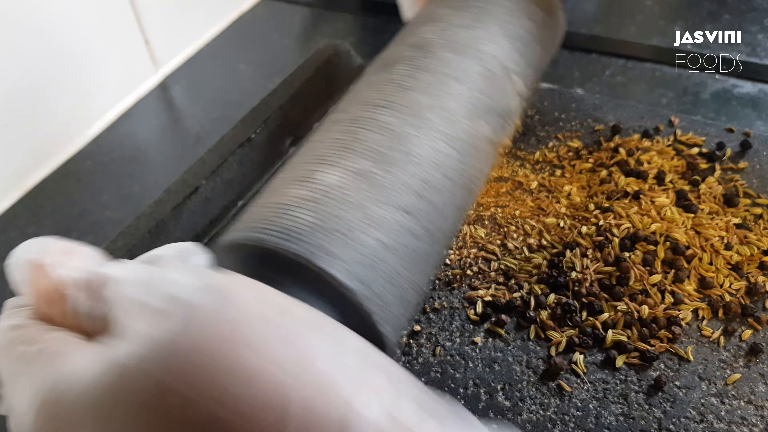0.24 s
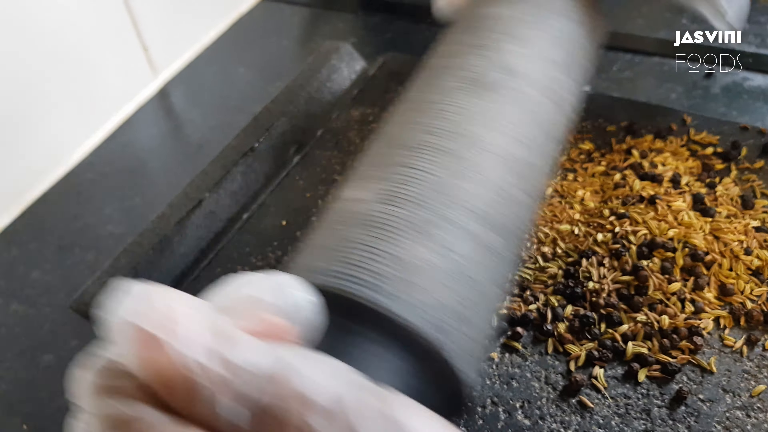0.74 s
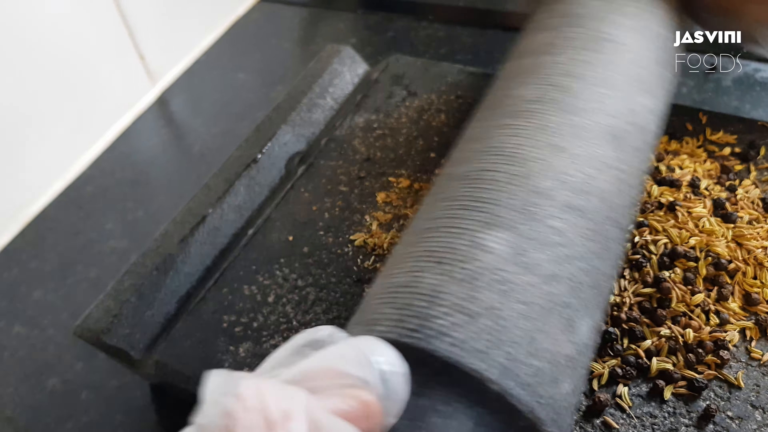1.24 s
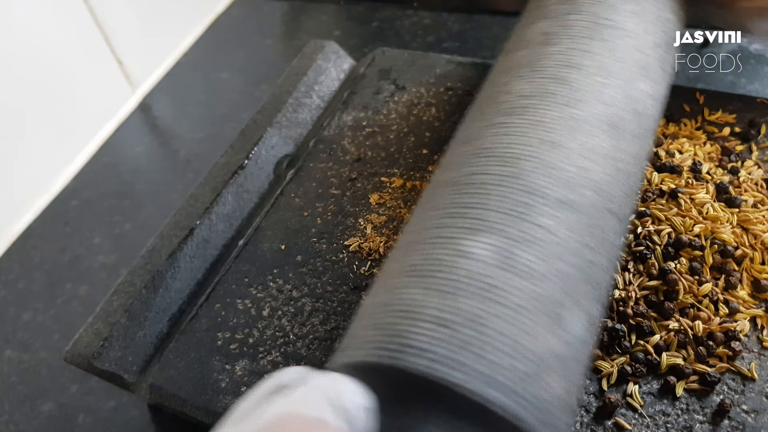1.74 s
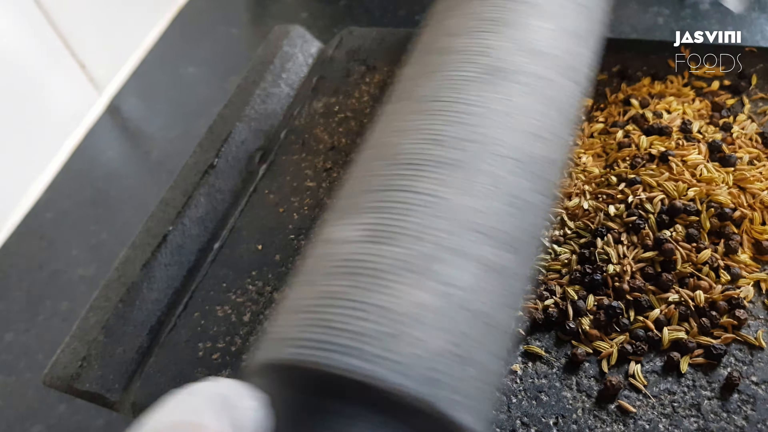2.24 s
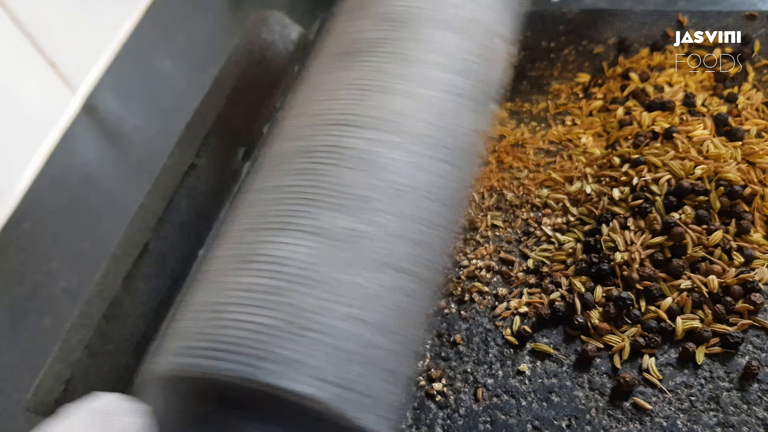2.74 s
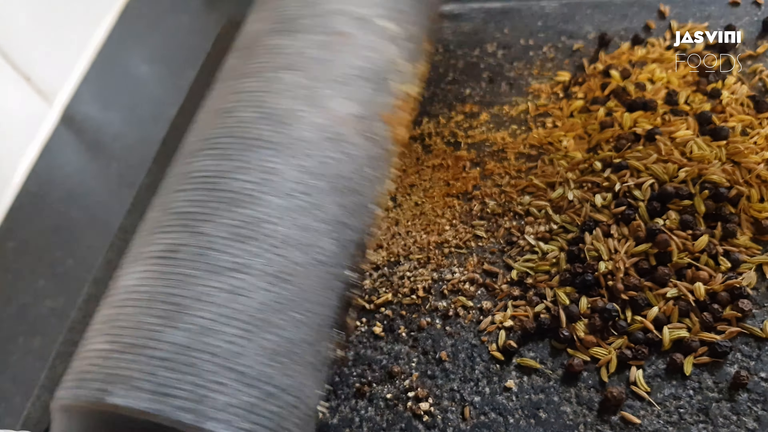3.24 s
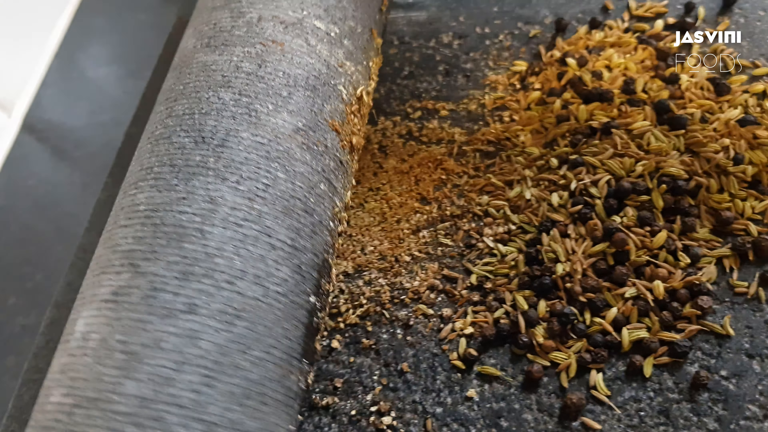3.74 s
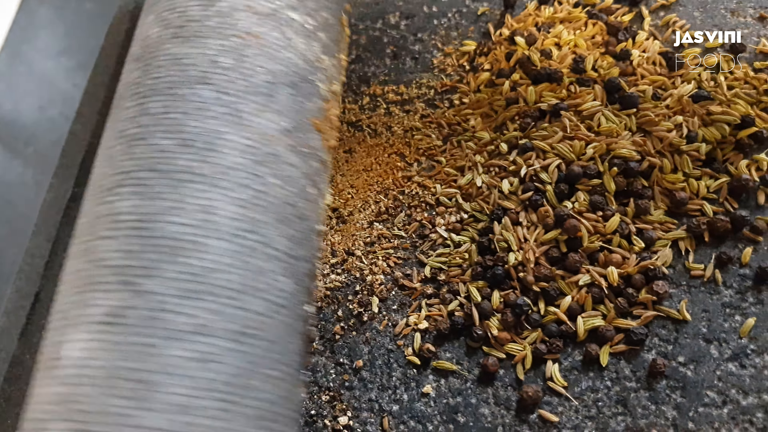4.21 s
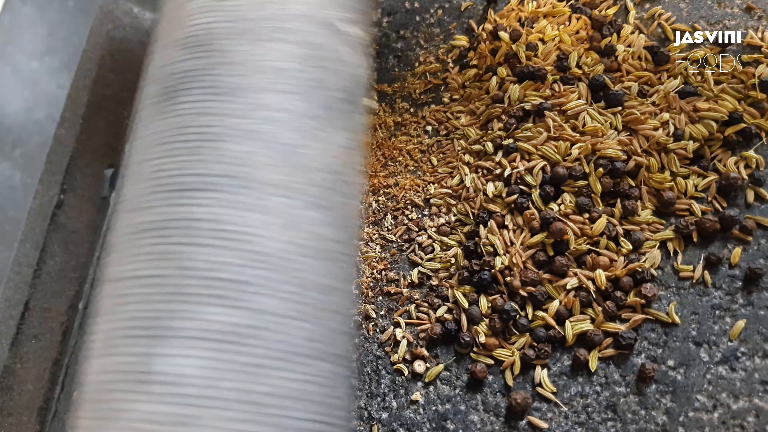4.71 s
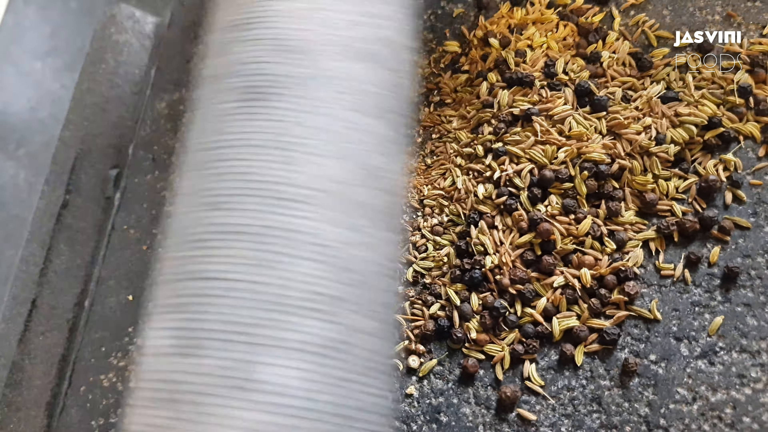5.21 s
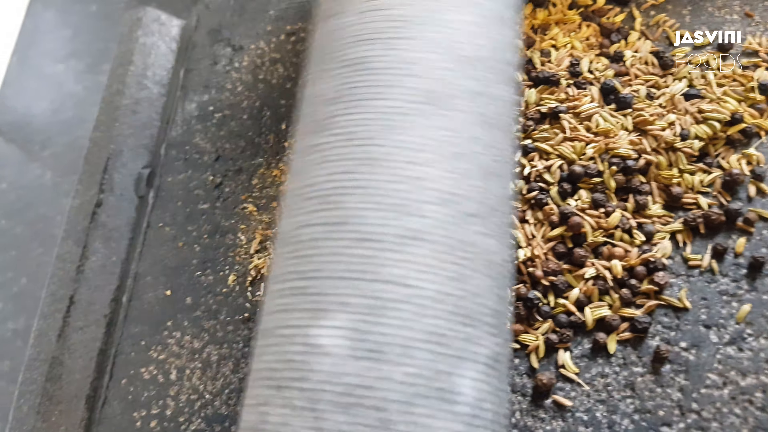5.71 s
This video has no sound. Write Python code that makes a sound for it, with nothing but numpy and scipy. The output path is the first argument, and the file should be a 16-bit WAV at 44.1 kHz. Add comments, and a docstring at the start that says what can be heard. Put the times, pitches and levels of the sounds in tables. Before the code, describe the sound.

A stone roller grinds spices back and forth on a stone slab, with quick gritty, rumbling strokes and occasional clinking knocks.

```python
"""Grinding spices on a stone slab

A stone roller is pushed to and fro over spices, close by in a kitchen. Grit under the roller drives
slab and counter into a rumble, crunches, hisses and keeps the roller's bending modes ringing faintly.
Husks tick. Knocks of the roller excite the modes of both stones, and now and then a seed snaps;
the walls reflect these impacts. A soft rustle accompanies the first strokes."""
import sys
import numpy as np
from scipy import signal
from scipy.fft import rfft, irfft
from scipy.io import wavfile
from scipy.ndimage import uniform_filter1d

SR = 44100
rng = np.random.default_rng(int(sys.argv[2]) if len(sys.argv) > 2 else 0)


def int16_out(signal):
    """Quantize to a 16-bit WAV file."""
    q = np.round(np.clip(np.atleast_2d(signal).T, -1, 1) * 32767)
    wavfile.write(sys.argv[1], SR, q.astype(np.int16))


N = 262836
HZ = np.fft.rfftfreq(N, 1 / SR)
TIME = np.arange(N) / SR


def amp(db):
    """Amplitude ratio: a factor of ten per 20 dB."""
    return 10 ** (np.asarray(db) / 20)


def over_frequency(table, column=1):
    """Interpolation of one column over log frequency."""
    columns = np.transpose(table)
    return np.interp(np.log(HZ + 1), np.log(columns[0] + 1), columns[column])


def resonance(hz, width):
    """Response of a damped oscillator, with gain 1 at its centre."""
    return 1 / (1 + 1j * (HZ ** 2 - hz ** 2) / (width * HZ + 1e-9))


def noise():
    """White Gaussian noise in two independent channels."""
    return rng.standard_normal((2, N))


def drift(per_s):
    """Slow random modulation of rms 1."""
    steps = rng.standard_normal(600)
    return unit_rms(np.interp(TIME * per_s, np.arange(len(steps)), steps))


def grit(per_s, spread_db):
    """Shot noise: grains break at random moments and with random strengths."""
    sizes = amp(spread_db * np.minimum(rng.exponential(1, N), 4))
    return unit_rms(noise() * sizes * (rng.random(N) < per_s / SR))


def unit_rms(x):
    """Normalisation to rms 1 in the mid channel."""
    return x / np.sqrt(np.mean(np.atleast_2d(x).mean(0) ** 2) + 1e-20)


def steadied(x, span_s, share):
    """Envelope compression: chance swells even out, as under the hands' steady pressure."""
    window = signal.windows.hann(int(span_s * SR) + 3)
    power = signal.fftconvolve(x.mean(0) ** 2, window / window.sum(), "same")
    return unit_rms(x / (abs(power) + 1e-3) ** (share / 2))


# sound field at two microphone ports:
# (frequency [Hz], coherence [0-1], phase lead of left [rad], left minus right [dB])
PORTS = [(130.68, 0.92, -2, 0.74), (297, 0.86, 1, 0.5), (446, 0.93, 1.2712, -5), (639.5, 1, 1.5, 7),
         (1020, 0.66, 1.37, 2), (1590, 0.083, 2.5, 3.5), (2315, 0.81, 1, -2.5), (2460, 1, 1.6031, 0.5),
         (3500, 0.2397, 1.5, 2), (5750, 0.65, 2, -3), (9200, 0.15, 1.5, 8), (14000, .45, 1.6, 2)]
def at_ports(drive, colour):
    """Partial coherence: two filtered drives mix at the ports, long waves almost alike; rms 1."""
    left, independent = rfft(drive)
    apart = .03 + .97 * HZ ** 6 / (HZ ** 6 + 230 ** 6)
    coherence = 1 - apart * (1 - over_frequency(PORTS))  # lowered by room reflections
    lead = apart * over_frequency(PORTS, column=2)
    right = (coherence * left + np.sqrt(1 - coherence ** 2) * independent) * np.exp(-1j * lead)
    lean = amp(over_frequency(PORTS, column=3) / 2)
    mid = np.sqrt(lean ** 2 + lean ** -2 + 2 * coherence * np.cos(lead))
    return unit_rms(irfft(np.array([left * lean, right / lean]) * colour / mid, N))


# strokes, pull and push in turn, with relative levels: (start [s], delay of peak pressure [% of stroke],
# grinding [dB], hiss [dB], rumble [dB], lower ring [dB], upper ring [dB], bare stone contact [dB])
STROKES = [(-.04, -14, -44, -55, -31, -43, -58, -4), (0.238, -1.5, -48, -56.5, -31, -45, -55, -4),
           (.465, -6, -45.5, -56.5, -33.5, -66.5, -50.5, 1.5),
           (0.693, 1.5, -45, -53, -32.5, -39.5, -58, -2), (0.919, -12, -43.5, -54, -33, -45, -47, 0),
           (1.115, 0.5, -39, -52, -30, -47.5, -46.5, -1.5), (1.334, -14, -43, -54.5, -33, -49, -58, -1),
           (1.563, 4, -39, -50, -30, -39, -56, -1.5), (1.767, -3, -42.5, -53, -30.5, -62, -44, 0.5),
           (2.013, -3.5, -42.5, -52.5, -34.5, -40, -59, -5), (2.247, 0.5, -41, -53, -30.5, -47.5, -50.5, 1),
           (2.463, -2, -40.5, -51.5, -30, -40.5, -53.5, -2.5),
           (2.688, -1.5, -43, -53.5, -34.5, -58, -46, 0.5), (2.919, -6, -38, -52, -36, -41, -56, -0.5),
           (3.143, 3, -40, -52.5, -34, -49, -46.5, 1.5), (3.348, -5, -39.5, -51, -29.5, -40, -47, 2.5),
           (3.59, 3.5, -40.5, -52.5, -35.5, -44, -38.5, 4.5),
           (3.788, -3.5, -42.5, -51.5, -28.5, -38, -42, 1),
           (4.033, -4, -42.5, -53.5, -36.5, -43, -46.5, -2), (4.25, -9.5, -42, -51.5, -29, -39, -53, -2),
           (4.475, -7.5, -43, -54.5, -34.5, -44, -46, -2),
           (4.693, -4.5, -40.5, -53, -29.5, -44.5, -49, -1.5),
           (4.918, 1.5, -42, -53, -33, -41.5, -51.5, -0.5),
           (5.133, -9, -39.5, -50.5, -32, -37.5, -51.5, -4.5),
           (5.371, -1.5, -38.5, -52.5, -33, -44.5, -44, -1.5),
           (5.578, -6.5, -38, -50, -28.5, -34.5, -50, -6), (5.805, 2, -40.5, -50.5, -26, -39.5, -45, 0.5)]
def strokes(end_s=6.02):
    """Reciprocating motion: the stroke under way at each moment and its progress, 0-1."""
    turns = [row[0] for row in STROKES] + [end_s]
    place = np.interp(TIME, turns, np.arange(len(turns)))
    stroke = np.minimum(place.astype(int), len(STROKES) - 1)
    return stroke, place - stroke


def stroke_gain(column):
    """Stepped envelope: one level per stroke, smoothed at the turns."""
    stroke, _ = strokes()
    return uniform_filter1d(amp(np.transpose(STROKES)[column])[stroke], size=600)


def swell(column, push_crest, pull_crest, sharpness, t60, rest_db):
    """Friction follows speed: each stroke is an arch of level with an exponential ring-out."""
    stroke, progress = strokes()
    delay = np.transpose(STROKES)[1][stroke] / 100
    crest = np.clip(np.where(stroke % 2, push_crest, pull_crest) + delay, .05, .95)  # share of stroke
    skewed = progress ** (np.log(.5) / np.log(crest))
    arch = abs(np.sin(np.pi * skewed)) ** sharpness
    retained = amp(-60 / (t60 * SR)) ** 2
    energy = signal.lfilter([1 - retained], [1, -retained], (stroke_gain(column) * arch) ** 2)
    return np.sqrt(energy + amp(rest_db) ** 2)


# modes of the slab on the counter: (frequency [Hz], bandwidth [Hz], level [dB])
COUNTER_MODES = [(67.342, 20.7, 2), (94.7, 59.5, -6), (115, 11, 3), (125.2, 5.8, 3)]
# the roller drops off coarse seeds: (time [s], level [dB])
BUMPS = [(.05, -28.5), (.6, -43.5), (0.809, -27), (1.0, -34), (1.221, -26.5), (1.48, -26.5), (1.67, -29),
         (1.71, -29), (2.13, -32), (2.33, -31), (2.85, -31.5), (3.02, -28.5), (3.46, -28), (3.51, -27.5),
         (4.075, -29), (4.12, -26.5), (4.16, -36.5), (5.04, -29.5), (5.67, -31.5)]
# stroke envelope: (push crest [0-1], pull crest [0-1], sharpness [exponent], t60 [s], rest level [dB])
RUMBLE_SWELL = (0.68, 0.4, 1.63, 0.33, -55)
def rumble(sway_db=-52, sway_hz=43, sway_exponent=0.45, bump_s=0.025):
    """Forced vibration: rolling over seeds shakes the slab; the heavy counter sways between strokes."""
    body = sum(amp(db) * abs(resonance(hz, width)) ** 2 for hz, width, db in COUNTER_MODES)
    body *= HZ ** 4 / (HZ ** 4 + 50 ** 4)
    bumps = sum(amp(db) * np.exp(-((TIME - s) / bump_s) ** 2) for s, db in BUMPS)
    force = np.hypot(swell(4, *RUMBLE_SWELL), bumps)
    sway = steadied(at_ports(noise(), resonance(sway_hz, 18.67) ** 3), span_s=0.19, share=0.4)
    shake = steadied(at_ports(noise(), body), span_s=0.1, share=0.54)
    return amp(-1.64) * force * shake + amp(sway_db) * unit_rms(force ** sway_exponent * sway)


# grinding spectra on the push and on the pull: (frequency [Hz], level [dB])
PUSH_SPECTRUM = [(100, -22.5), (175, 4), (250, 4), (275, 3), (315, 6.5), (385, -9.5), (440, 1.5),
                 (540, -11), (630, -2), (740, -4), (810, -15), (950, -9.5), (1600, -20.5), (2100, -20.5),
                 (2800, -28), (4200, -53)]
PULL_SPECTRUM = [(100, -43), (175, -2.5), (225, 2.5), (315, 1), (390, -15), (480, -5.5), (550, -15.5),
                 (700, -7), (850, -6.5), (1300, -15.5), (1650, -15), (2100, -19), (2800, -22.5),
                 (4200, -38)]
# stroke envelope of the grinding: columns as in RUMBLE_SWELL
GRIND_SWELL = (0.6759, 0.4164, 1.53, 0.03, -64.5)
def grinding(patchy_db=2.5):
    """Brittle fracture of coarse grains: the spectrum shifts with direction and point of contact."""
    stroke, _ = strokes()
    pulling = np.clip(uniform_filter1d(1. - stroke % 2, size=1500), 0, 1)
    grains = grit(per_s=1800, spread_db=2.0)
    push = at_ports(grains, amp(over_frequency(PUSH_SPECTRUM)))
    pull = at_ports(grains, amp(over_frequency(PULL_SPECTRUM)))
    spectrum = rfft(np.sqrt(1 - pulling) * push + np.sqrt(pulling) * pull)
    centres_hz = np.geomspace(200, 2600, 9)
    bands = (irfft(spectrum * np.interp(HZ, centres_hz, peak), N) for peak in np.eye(len(centres_hz)))
    crunch = unit_rms(sum(band * amp(patchy_db * drift(per_s=32)) for band in bands))
    return amp(-0.36) * swell(2, *GRIND_SWELL) * steadied(crunch, span_s=0.089, share=0.92)


# bending modes of the roller: (lower [Hz], upper [Hz])
BENDING_HZ = [2302, 2425]
# stroke envelope of each mode: columns as in RUMBLE_SWELL
RING_SWELLS = [(0.79, 0.27, 2.38, 0.16, -77), (0.58, 0.44, 3.6, 0.26, -74)]
def roller_ring(width_hz=10, skirt_hz=120, tone_share=0.11, wander_hz=3):
    """Mode splitting: the roller is not quite round, so rubbing excites two pitches as it rotates."""
    out = np.zeros((2, N))
    for k, hz in enumerate(BENDING_HZ):
        rough = at_ports(noise(), resonance(hz, width_hz) * resonance(hz, skirt_hz))
        pitch = [hz + wander_hz * drift(per_s=20) for port in range(2)]  # the point of contact moves
        tone = at_ports(np.sin(2 * np.pi * np.cumsum(pitch, axis=1) / SR), 1)
        ring = np.sqrt(1 - tone_share) * rough + np.sqrt(tone_share) * tone
        out += swell(5 + k, *RING_SWELLS[k]) * steadied(ring, span_s=0.093, share=0.752)
    return amp(-0.52) * out


# spectrum of fine grit: (frequency [Hz], level [dB])
HISS_SPECTRUM = [(1000, 4), (2700, 3), (4300, 3.5), (6300, -0.5), (8500, 4), (12000, 3), (14500, -6),
                 (16000, -4)]
# high stone modes: (frequency [Hz], bandwidth [Hz], level [dB], growth with bare contact [dB/dB])
OVERTONES = [(3536, 44, -2, 0), (5030, 20, -2, -0.5), (5740, 18.5, 3.5, 2), (6640, 15.7, -0.5, -0.567),
             (7740, 23.5, -8.5, 0.5), (8250, 47, -3.5, 0.5), (10070, 31, -7.5, -0.5), (10560, 17, -8, 0.5),
             (12040, 34, -6.5, 0.5), (13234, 67, -9.5, -0.5)]
# stroke envelope of fine grit and husks: columns as in RUMBLE_SWELL
HISS_SWELL = (0.716, 0.4, 1.14, 0.03, -67)
def hiss(flare_db=4.0, pressure_exponent=0.6567):
    """Friction noise: fine grit sizzles, and high modes flare where bare stone bites."""
    sand = at_ports(grit(per_s=9000, spread_db=-2.5) + .5 * noise(), amp(over_frequency(HISS_SPECTRUM)))
    drive = rfft(at_ports(grit(per_s=4000, spread_db=-0.5), 1))
    touch = stroke_gain(column=7)
    modes = np.zeros((2, N))
    for hz, width, db, growth in OVERTONES:
        flare = amp(db + flare_db * drift(per_s=18))
        modes += flare * touch ** growth * irfft(drive * resonance(hz, width), N)
    bare = touch * unit_rms(swell(2, *GRIND_SWELL)) ** pressure_exponent
    stone = bare * steadied(unit_rms(modes), span_s=0.66, share=0.62)
    # the more bare stone sings, the less grit is left to sizzle
    blend = (amp(1.0) * sand + amp(-1.24) * stone) / np.sqrt(1 + .5 * bare ** 2)
    return swell(3, *HISS_SWELL) * blend


def husks(hz=3560, width_hz=130, db=-4, fade_db_per_s=3.0):
    """Impulse excitation of a resonance: whole husks tick, more faintly as they are crushed."""
    ticks = at_ports(grit(per_s=160, spread_db=1.5), resonance(hz, width_hz) ** 2)
    return amp(db - fade_db_per_s * TIME) * swell(3, *HISS_SWELL) * ticks


# spectrum of the quiet room: (frequency [Hz], level [dB])
ROOM_SPECTRUM = [(20, -20), (42, 17), (100, -0.5), (200, 2), (600, -40), (2000, -45), (8000, -14),
                 (16000, -53.5)]
def room_tone():
    """Stationary noise: a faint background, mostly bass."""
    return amp(-62.5) * at_ports(noise(), amp(over_frequency(ROOM_SPECTRUM)))


def struck_modes(table, t):
    """Free vibration: damped sinusoids at the two ports, as modes x channels x time."""
    port_hz, _, leads, leans_db = np.transpose(PORTS)
    side = np.array([[.5], [-.5]])
    modes = []
    for hz, db, t60 in table:
        decay = amp(db - 60 * t / t60 + side * np.interp(hz, port_hz, leans_db))
        modes.append(decay * np.sin(2 * np.pi * hz * t + side * np.interp(hz, port_hz, leads)))
    return np.array(modes)


def softened(x, db, edge_hz=5200, db_per_octave=9):
    """Contact time limits bandwidth: a gentler blow lasts longer and holds less treble."""
    cutoff_hz = np.clip(edge_hz * 2 ** ((db + 8.5) / db_per_octave), 1300, 12000)
    return signal.sosfilt(signal.butter(2, cutoff_hz, fs=SR, output="sos"), x)


# modes of the struck roller and slab: (frequency [Hz], level [dB], t60 [s])
ROLLER_MODES = [(2309.2, -6.5, 0.12), (2270, -14.5, 0.02712), (2420, -23, 0.4), (2515, -25.5, 0.16),
                (2640, -24, 0.013), (3509.4, -28, 0.025)]
SLAB_MODES = [(122, -17.5, 0.28), (239, -7, 0.061), (316.7, -4.5, 0.057), (494, -18, 0.27),
              (641, -7.5, 0.076), (737.4, -15.5, 0.11), (1030, -39, 0.009), (1060, -10, 0.05237),
              (1208, -6, 0.034), (1475, -11.5, 0.025), (1647, -4, 0.072), (1668, -12.5, 0.04253),
              (2075, -3.5, 0.033)]
# blur of the many weaker modes of slab and counter: (frequency [Hz], level [dB])
SCATTER_SPECTRUM = [(50, 9.5), (120, 1.5), (300, 7), (410, -7.5), (800, 0.5), (1750, -2.5), (2300, -6),
                    (3000, -18), (3600, -10), (5000, -34)]
# stone meets stone: (time [s], clink level [dB], thud level [dB], left minus right [dB])
KNOCKS = [(0.044, -17, -21, 2.5), (.383, -51, -26, -3), (0.4932, -11.5, -18.5, -1.5),
          (0.9313, -8, -20.5, 0), (1.316, -32.5, -34, 0), (1.374, -57, -38.5, -3), (1.7567, -4, -17.5, 0),
          (1.819, -49, -30, 1), (2.053, -68.5, -49.5, -1), (2.247, -56, -34.5, -1), (2.616, -25.5, -29, -2),
          (2.719, -1, -19, -0.5), (3.014, -39, -37, -2), (3.428, -40, -38, 0), (3.588, -40, -31, 1.5),
          (3.892, -13, -21, 0.5), (4.051, -40, -29.5, 5.5), (4.319, -52, -41, 4), (4.342, -32.5, -42, 13.5),
          (4.447, -30, -27.5, 3.5), (4.486, -31, -41, -6), (4.507, -11, -24, 0), (4.757, -44.5, -39, -0.5),
          (5.379, -61, -32, 3), (5.743, -44, -28.5, -1)]
def knocks(clink_rise_s=0.0014, thud_rise_s=0.00039, burst_t60=0.039, tail_t60=0.18, vary_db=2.7):
    """Modal superposition: each blow sums a bright clink of the roller and a dull thud of the slab."""
    out, t = np.zeros((2, N)), TIME[:SR // 3]
    clink = struck_modes(ROLLER_MODES, t).sum(0) * (1 - np.exp(-t / clink_rise_s))
    slab = struck_modes(SLAB_MODES, t)
    scatter = steadied(at_ports(noise(), amp(over_frequency(SCATTER_SPECTRUM))), span_s=0.035, share=.5)
    scatter_decay = amp(-5 - 60 * t / burst_t60) + amp(-14 - 60 * t / tail_t60)
    for k, (s, clink_db, thud_db, pan_db) in enumerate(KNOCKS):
        # the place of the blow sets the strength and sign of each mode
        shares = amp(-0.3 + vary_db * rng.standard_normal(len(slab))) * rng.choice([-1, 1], len(slab))
        blur = np.roll(scatter, -k * len(t), axis=1)[:, :len(t)] * scatter_decay
        thud = (np.tensordot(shares, slab, 1) + blur) * (1 - np.exp(-t / thud_rise_s))
        blow = amp(clink_db) * clink + amp(thud_db) * softened(thud, thud_db)
        start = round(s * SR)
        out[:, start:start + len(t)] += blow[:, :N - start] * amp([[pan_db / 2], [-pan_db / 2]])
    return out


def contact(lift_db=7, lift_s=0.0067):
    """Loss of contact: the roller rides up on a seed and rubs less just before each knock."""
    lifted = sum(np.exp(-abs(TIME - s) / lift_s) * (TIME < s) for s, *_ in KNOCKS)
    return amp(-lift_db * uniform_filter1d(lifted, size=60))


def kitchen_reverb(x, t60=0.34, wet_db=-14, echoes_per_s=2000, gap_s=.012):
    """Reverberation: hard walls return a short diffuse tail."""
    t = TIME[:SR // 2]
    echoes = rng.standard_normal((2, len(t))) * (rng.random((2, len(t))) < echoes_per_s / SR)
    tail = echoes * amp(-60 * t / t60) * (t > gap_s)
    tail /= np.linalg.norm(tail, axis=1, keepdims=True)
    return amp(wet_db) * signal.fftconvolve(x, tail, axes=1)[:, :N]


# seeds split: (time [s], level [dB], t60 [s])
SNAPS = [(0.2375, -37, 0.04393), (.323, -51, 0.0188), (0.379, -42, 0.03408), (0.394, -41.5, 0.07),
         (.41, -51, .03), (.445, -47.5, 0.043), (.477, -46, 0.025), (0.495, -40.5, 0.044),
         (.59, -43.5, .03), (1.779, -30, 0.027), (1.785, -38, 0.088), (3.527, -36, 0.026),
         (4.485, -40.5, 0.025), (4.8622, -38.5, 0.0328)]
# spectrum of a splitting seed: (frequency [Hz], level [dB])
SNAP_SPECTRUM = [(1000, -9), (3000, -0.5), (4500, 3), (7500, 1), (11000, 5), (16000, 1.5)]
def seed_snaps(rise_s=0.00072):
    """Sudden fracture: a seed splits with a short, bright burst of noise."""
    bursts = np.zeros(N)
    for s, db, t60 in SNAPS:
        age = np.maximum(TIME - s, 0)
        bursts += amp(db - 60 * age / t60) * (1 - np.exp(-age / rise_s))
    return bursts * at_ports(noise(), amp(over_frequency(SNAP_SPECTRUM)))


# envelope of the rustle: (time [s], level [dB])
RUSTLE = [(.3, -78), (.6, -60), (1.2, -64.5), (1.7, -65.5), (2.1, -96)]
def rustle(hz=8500, width_hz=5000):
    """Filtered shot noise: a soft, grainy rustle, perhaps of gloves on the handles."""
    envelope = amp(np.interp(TIME, *np.transpose(RUSTLE)))
    return envelope * at_ports(grit(per_s=5000, spread_db=1.5), resonance(hz, width_hz))


def scene():
    """Linear superposition: rubbing, impacts and their reflections add over the quiet of the room."""
    rubbing = rumble() + contact() * (grinding() + roller_ring() + hiss() + husks())
    impacts = knocks() + seed_snaps()
    return rubbing + room_tone() + rustle() + impacts + kitchen_reverb(impacts)


def record(dry, low_hz=32, high_hz=15700):
    """Band limiting: the lowest bass and the highest treble are filtered out."""
    highpass = signal.butter(4, low_hz, "highpass", fs=SR, output="sos")
    lowpass = signal.firwin(1023, high_hz, window=("kaiser", 9), fs=SR)
    return signal.oaconvolve(signal.sosfilt(highpass, dry), lowpass[None], "same", axes=1)


dry = scene()
out = record(dry)
int16_out(out)
```